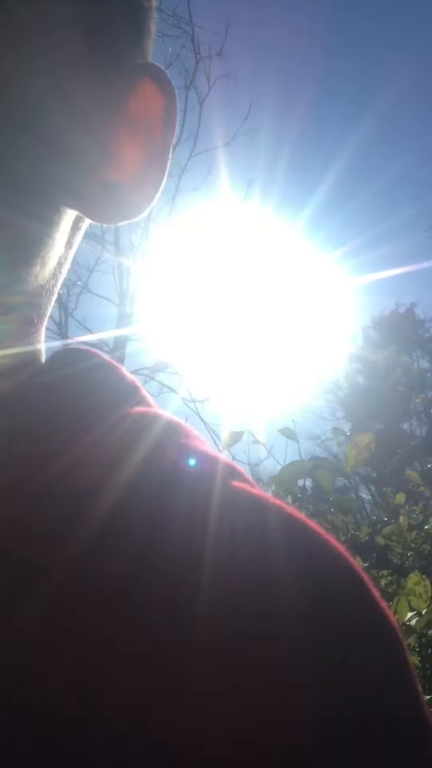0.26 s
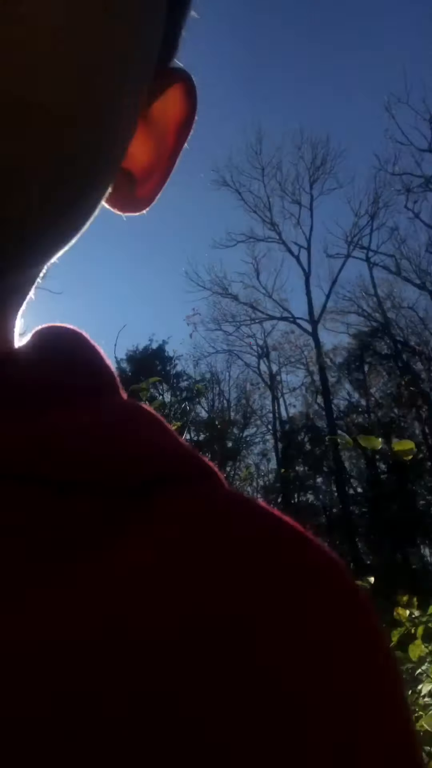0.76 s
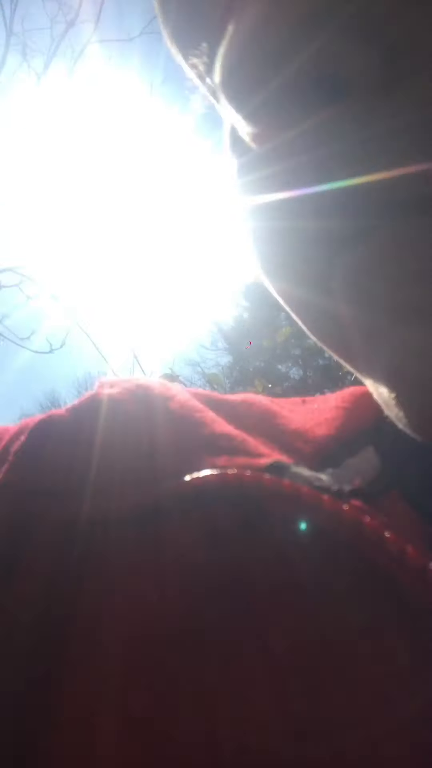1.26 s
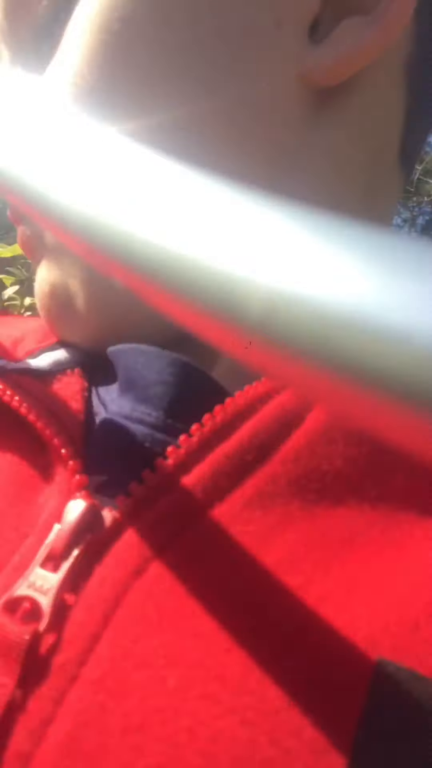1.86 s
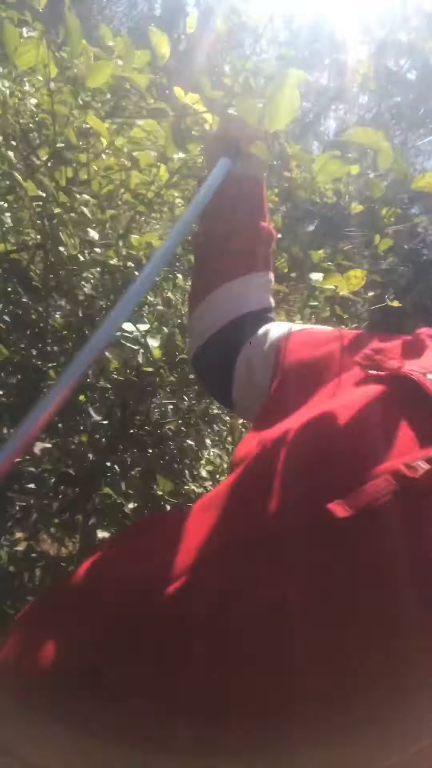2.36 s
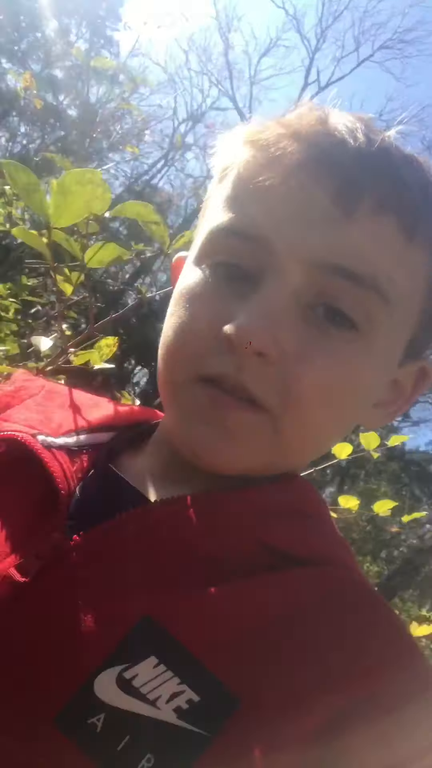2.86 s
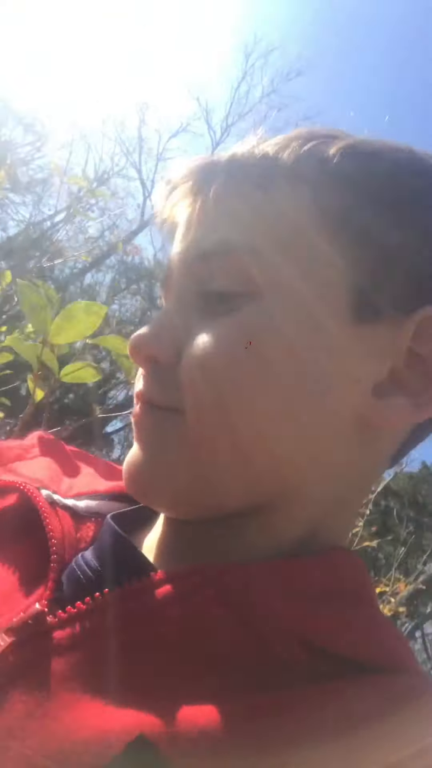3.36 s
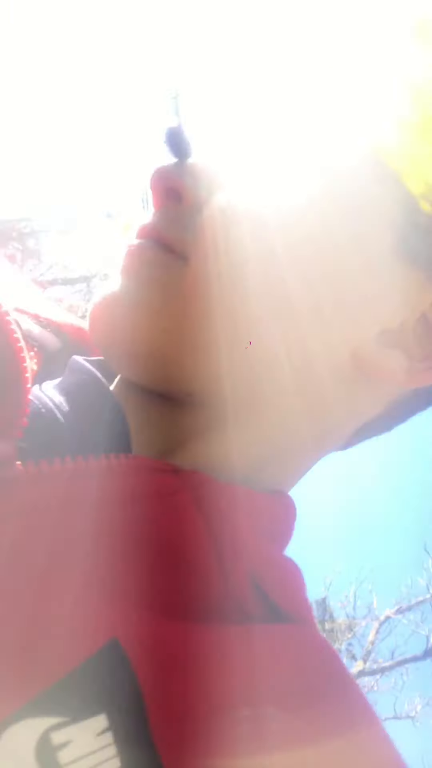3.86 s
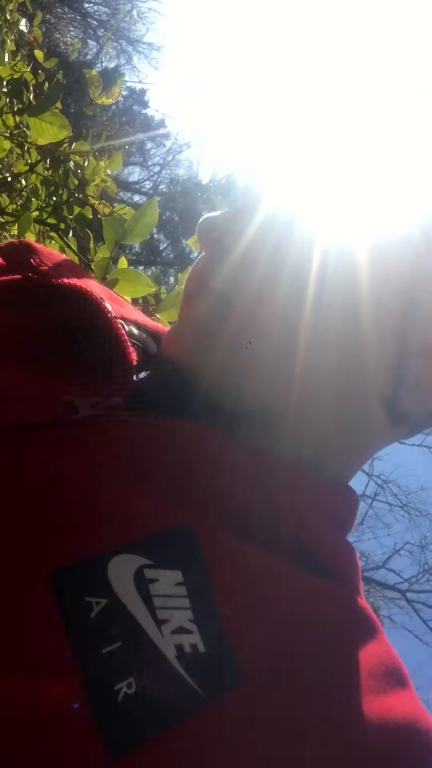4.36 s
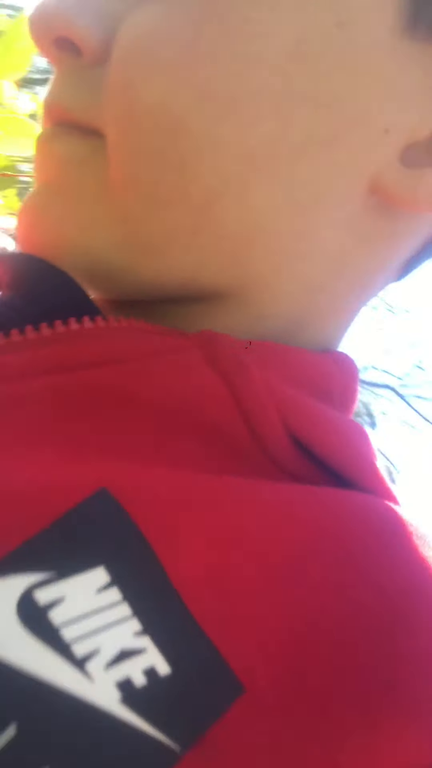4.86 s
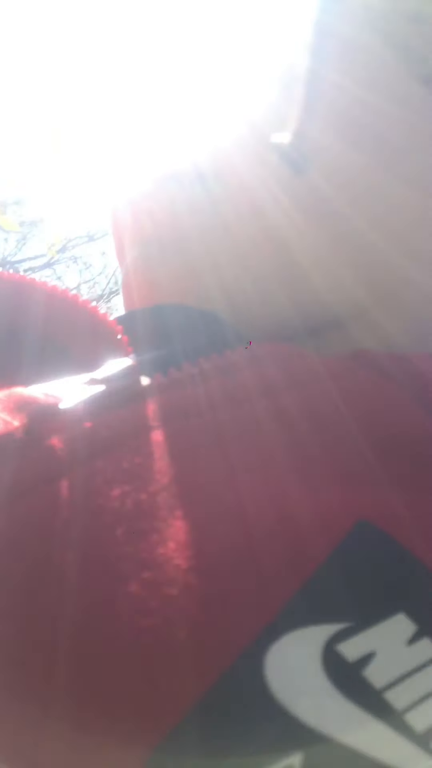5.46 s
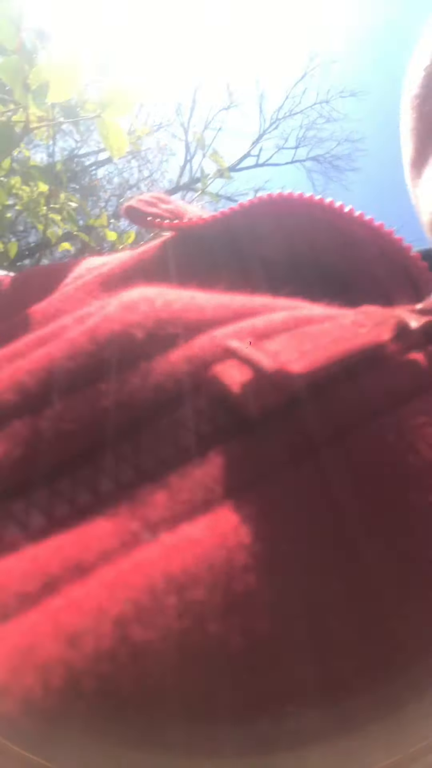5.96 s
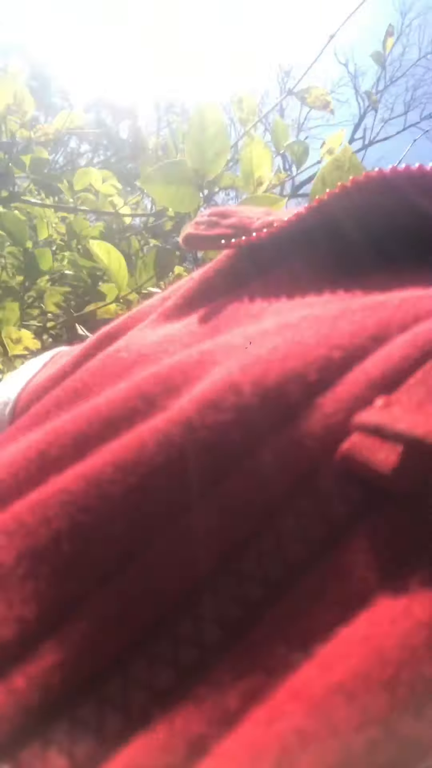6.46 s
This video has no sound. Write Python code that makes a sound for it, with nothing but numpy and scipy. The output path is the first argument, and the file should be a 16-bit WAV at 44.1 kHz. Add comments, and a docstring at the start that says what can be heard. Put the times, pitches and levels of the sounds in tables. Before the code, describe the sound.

Dry leaves and stems rustle and swish close by as someone pushes through brush, twigs snapping sharply, one hard stick knock, faint engine drone underneath.

```python
"""Dry brush: someone pushes through it with a hand-held microphone and a light metal pole.
Leaves hiss and crackle and stems brush past (coloured grainy noise); twigs snap (click, noise burst, ring).
One stick knocks hard close by (ringing modes and a crack); twigs squeak along the pole (gliding sines).
A distant engine drones underneath (harmonics of its cycle) over a far rumble (low noise).
The gain control ducks just after loud sounds and recovers slowly."""
import sys
import numpy as np
from scipy import signal
from scipy.io import wavfile
from scipy.ndimage import uniform_filter1d

SR = 44100
rng = np.random.default_rng(int(sys.argv[2]) if len(sys.argv) > 2 else 0)


def wav_out(sig):
    """Save sig, one row per channel (or a flat mono array), as 16-bit PCM at SR to the path in sys.argv[1]."""
    wavfile.write(sys.argv[1], SR, np.round(np.clip(np.atleast_2d(sig).T, -1, 1) * 32767).astype(np.int16))


N = 296793


def from_db(db):
    """Decibels to amplitude gain."""
    return 10 ** (np.asarray(db) / 20)


def rms_one(x):
    """Scales to rms 1."""
    return x / np.sqrt(np.mean(x ** 2) + 1e-20)


def in_time(rows):
    """Each column after t/s as a curve over all samples."""
    times_s, *columns = np.transpose(rows)
    t = np.arange(N) / SR
    return [np.interp(t, times_s, column) for column in columns]


def band(x, low_hz, high_hz):
    """Second-order Butterworth band-pass."""
    edges_hz = [low_hz, min(high_hz, 0.45 * SR)]
    return signal.sosfilt(signal.butter(2, edges_hz, "band", fs=SR, output="sos"), x)


def drift(rate_hz):
    """Slow random curve of rms 1, changing about rate_hz times a second."""
    step = 40   # samples between drawn points
    pole = np.exp(-2 * np.pi * rate_hz * step / SR)
    noise = rng.standard_normal(N // step + 2002)
    slow = signal.lfilter([1], [1, -2 * pole, pole ** 2], noise)[2000:]   # settled part
    return np.interp(np.arange(N) / step, np.arange(len(slow)), rms_one(slow))


def ring(x, hz, t60_s):
    """Two-pole resonator: a unit click sets a decaying sine of height 1 ringing."""
    radius = from_db(-60 / (t60_s * SR))
    angle = 2 * np.pi * hz / SR
    poles = [1, -2 * radius * np.cos(angle), radius ** 2]
    return signal.lfilter([0, np.sin(angle)], poles, x + 1e-18)


def coloured(sources, spectrum, patchy_db, tilt_db=0):
    """Quarter-octave bands, alternately from two sources, flickering separately; tilt_db/octave about 6 kHz."""
    hz_points, db_points = np.transpose(spectrum)
    octaves = np.log2(hz_points[-1] / hz_points[0])
    edges_hz = np.geomspace(hz_points[0], hz_points[-1], round(4 * octaves) + 1)
    out = 0
    for k, (low_hz, high_hz) in enumerate(zip(edges_hz, edges_hz[1:])):
        centre_hz = np.sqrt(low_hz * high_hz)
        level_db = np.interp(np.log(centre_hz), np.log(hz_points), db_points)
        level_db = level_db + tilt_db * np.log2(centre_hz / 6000)
        flicker_db = patchy_db * drift(10.545)
        out = out + from_db(level_db + flicker_db) * band(sources[k % 2], low_hz, high_hz)
    return out


def crackle(per_s, spread_db, grain_s, hiss_share):
    """Clumped tiny contacts, each a decaying puff of noise, over smooth hiss; two unrelated carriers."""
    sizes = from_db(spread_db * np.minimum(rng.exponential(1, N), 4))
    born = rng.random(N) < per_s * from_db(5.0 * drift(20)) / SR   # drifting rate makes clumps
    decay = np.exp(-1 / (grain_s * SR))
    puffs = rms_one(signal.lfilter([1], [1, -decay], sizes * born))
    envelope = np.sqrt(hiss_share + (1 - hiss_share) * puffs ** 2)
    return rng.standard_normal((2, N)) * envelope


# leaf and stem colour: f/Hz, relative density/dB per Hz
LEAF_COLOUR = [(900, -18), (1400, -10), (2500, -7.5), (3800, -5.5), (5000, -6), (6800, -5), (8500, -9),
               (11500, -7), (16500, -10)]
STEM_COLOUR = [(150, -6.5), (300, -3), (600, -1.5), (1200, -1), (1900, -7), (3000, -14)]
# slowly rising and falling background rustle of leaves and stems:
# t/s, leaf level/dB, leaf brightness/dB per octave, stem level/dB
RUSTLE_CURVE = [(0.0, -71, -1, -74), (0.12, -70, -1, -72), (0.78, -74.5, -2, -75), (1.0, -67.5, -1, -70.5),
                (1.72, -69, 1, -70), (1.82, -62.5, -0.14, -66), (2.05, -53, -0.045, -60),
                (2.33, -50, -0.2024, -58), (2.57, -62, -0.5, -71), (2.8, -62, 0, -66.5),
                (2.87, -67, -0.5, -71), (3.3, -59, -0.2289, -63), (3.72, -68.5, -0.5, -75),
                (4.7, -65, -0.5, -67), (5.06, -70, 1.5, -69.5), (5.7, -74, -0.6, -67), (6.3, -67, 2.4, -65),
                (6.73, -69, 2.2, -65)]
# branches swishing past: peak t/s, 10 dB swell/s, 10 dB fade/s, leaf level/dB,
# leaf brightness/dB per octave, stem level/dB; a negative swell or fade leaves the swish all but silent
BRANCH_SWISHES = [(0.019, 0.13, 0.0544, -58.5, -2, -64.5), (0.32, 0.2846, 0.0964, -65.5, 0, -78),
                  (0.865, 0.0321, 0.0534, -52, -1.8, -63.5), (0.99, 0.0571, 0.0221, -59, 2, -66.5),
                  (1.085, 0.0586, 0.0619, -53, -1.5, -57), (1.23, 0.0148, .12, -63, -1.3, -67.5),
                  (1.33, 0.0748, 0.0036, -63, -1.3, -63.5), (1.45, 0.0238, 0.0945, -63.5, 1, -65),
                  (1.589, 0.0889, .08, -58.5, -1, -58), (1.7, .05, -0.0025, -61.5, 0.1, -67),
                  (1.8, 0.1011, 0.1056, -57.5, -0.3, -62), (2.02, 0.0429, 0.1556, -52, 0.6, -64),
                  (2.25, 0.1091, 0.1022, -47, 0.4, -57.5), (2.39, 0.0703, 0.0442, -49.5, -0.8, -61),
                  (2.47, 0.0236, 0.089, -53.5, -1.6, -63), (3.115, .03, .06, -62, -1.2, -67),
                  (3.49, .04, 0.0835, -60, 0.6, -62.5), (3.57, 0.0404, 0.1264, -63.5, -1.1, -68),
                  (3.842, 0.0217, 0.089, -52.5, -0.6, -65.5), (4.009, 0.0722, -0.0297, -63, 0.1, -63),
                  (4.12, 0.0736, 0.0946, -63, -0.6, -59), (4.23, 0.0139, 0.1525, -64, -2.4, -61),
                  (4.36, 0.0561, 0.0121, -58.5, -0.6, -64.5), (4.57, 0.097, 0.0134, -57.5, -1.1, -66.5),
                  (4.662, 0.0404, 0.1228, -56.5, 0.2, -66), (4.81, 0.0818, 0.0808, -55, 0.4, -65.5),
                  (4.94, 0.044, 0.0912, -63, 1.1, -66), (5.168, .08, .05, -61.5, 2.6, -65.5),
                  (5.208, .055, .045, -61, -2.8, -51.5), (5.29, .015, .15, -59, 2.1, -70),
                  (5.39, 0.0335, 0.098, -55.5, 3, -54), (5.48, 0.0791, 0.0962, -57, -1.5, -56),
                  (5.545, 0.0357, .03, -60, 1.1, -61), (5.65, .05, .03, -63, 1.1, -63.5),
                  (5.75, .02, .25, -63.5, 1.6, -82.5), (6.059, 0.1134, 0.1069, -56.5, -2.5, -65),
                  (6.185, .05, .15, -63.5, 2.2, -66), (6.51, -0.05, -0.0335, -66.5, 1.1, -63.5)]


def brush():
    """Bright leaves and duller stems: rustle and swishes add in power; the louder sets leaf brightness."""
    leaf_db, brightness_db, stem_db = in_time(RUSTLE_CURVE)
    power = from_db([leaf_db, stem_db]) ** 2
    weighted_db = brightness_db * power[0]
    t = np.arange(N) / SR
    for peak_s, swell_s, fade_s, leaf_db, brightness_db, stem_db in BRANCH_SWISHES:
        start = max(0, round((peak_s - 4 * swell_s) * SR))
        near = slice(start, round((peak_s + 4 * fade_s) * SR))
        since_s = t[near] - peak_s
        shape = 10 ** -np.maximum(since_s / fade_s, -since_s / swell_s)   # power
        power[:, near] += from_db([[leaf_db], [stem_db]]) ** 2 * shape
        weighted_db[near] += brightness_db * from_db(leaf_db) ** 2 * shape
    leaf_grains = crackle(per_s=500.0, spread_db=3.36, grain_s=0.001396, hiss_share=0.6005)
    stem_grains = crackle(per_s=300.0, spread_db=2.7, grain_s=0.002267, hiss_share=0.6)
    leaves = coloured(leaf_grains, LEAF_COLOUR, patchy_db=1.6418, tilt_db=weighted_db / power[0])
    stems = coloured(stem_grains, STEM_COLOUR, patchy_db=2.5)
    return np.sqrt(power[0]) * rms_one(leaves) + np.sqrt(power[1]) * rms_one(stems)


# twig snaps: t/s, ring f/Hz, relative thud, body and spit levels/dB, t60/s
TWIG_SNAPS = [(0.019, 7190, -62.5, -66.5, -40, 0.02076), (0.312, 3097, -58, -51.5, -45, 0.02385),
              (0.846, 2602, -51.5, -43.5, -37.5, 0.0084), (0.868, 7004, -61, -49.5, -40.5, 0.01192),
              (0.9, 5360, -57.5, -53, -37, 0.00825), (1.032, 2074, -69, -45.5, -47, 0.01452),
              (1.154, 1790, -61.5, -71, -37.5, 0.00616), (1.28, 2011, -68.5, -39, -55.5, 0.01096),
              (1.456, 3045, -50.5, -44, -53, 0.01575), (1.507, 841.5, -75.5, -46, -55.5, 0.01822),
              (1.594, 2810, -63, -49, -49.5, 0.03016), (1.697, 2119, -60, -44, -43, 0.012),
              (1.708, 6400, -63.5, -61.5, -33, 0.01179), (1.742, 923.2, -44, -42, -45, 0.02232),
              (1.759, 1107, -71, -46.5, -44, 0.02368), (1.807, 1503, -54.5, -39.5, -36, 0.00798),
              (2.01, 6342, -72, -45, -38.5, 0.02383), (2.157, 1132, -61.5, -37, -46, 0.01331),
              (2.214, 7500, -55.5, -39, -34, 0.025), (2.238, 6447, -49.5, -45.5, -38, 0.01486),
              (2.253, 7524, -48, -24, -21, 0.021545), (2.279, 5656, -45, -42.5, -28, 0.00972),
              (2.303, 5590, -57, -52, -33.5, 0.00601), (2.381, 1712, -45, -32.5, -29, 0.015515),
              (2.399, 3761, -66, -41, -28, 0.02043), (2.71, 2500, -67, -49, -50, 0.012),
              (3.168, 1609, -51, -47, -41, 0.02901), (3.386, 7017, -72, -56.5, -39, 0.012),
              (3.41, 3703, -69.5, -46.5, -53.5, 0.03045), (3.479, 1495, -68, -46.5, -52, 0.047),
              (3.826, 5293, -42.5, -36.5, -45.5, 0.0318), (3.972, 3871, -58, -52, -56, 0.012),
              (4.443, 813, -44.5, -48, -54.5, 0.01823), (4.554, 1183, -55.5, -36, -34, 0.00937),
              (4.574, 3746, -60, -48, -57, 0.02667), (4.617, 2200, -50, -35, -50, 0.01),
              (4.6207, 2466, -50, -37, -50, 0.012), (4.681, 1256, -34.5, -52, -55.5, 0.010325),
              (4.763, 3323, -69.5, -44, -54, 0.00786), (5.079, 1857, -44.5, -36.5, -42, 0.00741),
              (5.115, 1230, -52, -54, -59, 0.0054), (5.319, 1385, -34, -32, -47, 0.011626),
              (5.362, 709, -40, -60, -55.5, 0.00719), (5.374, 7230, -60, -58.5, -42.5, 0.01103),
              (6.187, 711, -60.5, -49, -45, 0.04015), (6.232, 897.6, -40.5, -46.5, -48, 0.00567),
              (6.311, 1500, -58, -47, -48, 0.01156), (6.494, 1100, -52, -56, -66, 0.012)]


def snaps():
    """Each break is a click and a dying burst of fibres tearing; the twig rings briefly at its own pitch."""
    size = 4000   # samples
    out = np.zeros(N + size)
    t = np.arange(size) / SR
    for start_s, hz, *levels_db, t60_s in TWIG_SNAPS:
        burst = rng.standard_normal(size) * from_db(-60 * t / t60_s)
        burst[0] = 5.894   # click
        burst += from_db(-21.5) * ring(burst, hz, t60_s)
        thud, body, spit = band(burst, 250, 1200), -band(burst, 1200, 5000), band(burst, 5000, 16000)
        at = round(start_s * SR)
        for db, part in zip(levels_db, (thud, body, spit)):
            crest = np.sqrt(2 * uniform_filter1d(part ** 2, size=30).max())   # from short-time rms
            out[at:at + size] += from_db(db - 3.5) * part / crest
    return out[:N]


# stick modes: f/Hz, level re click/dB, t60/s
STICK_MODES = [(98.18, -16, 0.061), (298.46, -15.5, 0.04466), (582.7, -7, 0.04276), (657.42, -0.5, 0.04769),
               (999.7, 0.5, 0.01817), (1213.4, 1, 0.01595), (1465.2, -7, 0.02965), (1682.9, -2.5, 0.02573),
               (1768.2, 5, 0.013), (2157.8, -8.5, 0.03164), (2456.2, -10.5, 0.02565),
               (2849, -11.5, 0.04782), (3163.3, -12, 0.0497), (3731.1, -10, 0.02704),
               (4441.5, -7.5, 0.01813), (5336.9, -10.5, 0.02434), (5629, -17.5, 0.05354),
               (6925.7, -7.5, 0.01962), (8007.4, -6.5, 0.01021), (9157, 0.5, 0.003815)]
KNOCK_S, KNOCK_DB = 1.530, -19
REBOUND_S, REBOUND_DB = 0.00231, -14.5   # after the blow, re the blow
CRACK_DB, CRACK_T60_S = -20, 0.018353    # noise level before band-pass


def knock():
    """One hard blow: a short splintering crack, and all the stick's modes set ringing."""
    at = round(KNOCK_S * SR)
    click = np.zeros(N)
    click[at] = from_db(KNOCK_DB)
    click[at + round(REBOUND_S * SR)] = -from_db(KNOCK_DB + REBOUND_DB)   # the stick springs back
    rings = [from_db(db) * ring(click, hz, t60_s) for hz, db, t60_s in STICK_MODES]
    # a thin stick radiates little below its first bending modes
    bending = band(sum(rings[2:]), 801.85, 11000)
    hand_thump = rings[0] - rings[1]
    out = bending + hand_thump
    size = 2000
    since_s = np.arange(size) / SR
    splinter = band(rng.standard_normal(size), 1303, 10721)
    out[at:at + size] += from_db(CRACK_DB - 60 * since_s / CRACK_T60_S) * splinter
    return out


# twigs sliding along or pinging the pole: t/s, length/s, first f/Hz, last f/Hz, level/dB before flutter
POLE_SQUEAKS = [(1.055, 0.0345, 3810, 4059, -56), (1.325, .115, 5750, 5900, -60),
                (1.42, .07, 5900, 5300, -65), (1.38, .07, 5170, 5190, -67),
                (2.398, 0.01888, 3700, 3719, -50.5), (2.455, .025, 3000, 3044, -55),
                (3.465, .04, 1350, 1476, -56.5), (4.435, .045, 810, 958.7, -54.5),
                (4.489, .05, 1000, 1285, -59), (4.473, .06, 2680, 3030, -62.5),
                (4.528, .06, 3300, 3987, -71.5), (4.628, .065, 2400, 4850, -57),
                (4.694, .065, 810, 1767, -64.5), (5.51, .065, 535, 490.3, -55.5),
                (5.624, .045, 600, 542.3, -57), (5.772, .095, 6200, 7300, -68),
                (5.79, .06, 3000, 3100, -72)]
EDGE_SHARE, EDGE_DB, SAG_DB = 0.2054, -11.5, -5   # fade in and out; level lost while it holds


def squeaks():
    """Stick-slip tones that glide as the contact slides; pitch and level tremble."""
    out = np.zeros(N)
    tremble_hz = 71.21 * drift(196.8)
    flutter = 1 + 0.5 * drift(160.9)
    for start_s, length_s, first_hz, last_hz, level_db in POLE_SQUEAKS:
        along = np.linspace(0, 1, round(length_s * SR))
        start = round(start_s * SR)
        span = slice(start, start + len(along))
        shape_db = np.interp(along, [0, EDGE_SHARE, 1 - EDGE_SHARE, 1], [EDGE_DB, 0, SAG_DB, EDGE_DB])
        hz = first_hz + (last_hz - first_hz) * along + tremble_hz[span]
        out[span] += from_db(level_db + shape_db) * np.sin(2 * np.pi * np.cumsum(hz) / SR)
    return out * flutter


# distant engine: t/s, level/dB
ENGINE_LEVEL = [(0.0, -58), (0.2, -57), (1.31, -61.5), (1.85, -57), (2.15, -60), (2.3, -56), (3.15, -58.5),
                (3.3, -53), (3.75, -60), (5.16, -59), (5.44, -72), (6.17, -60.5), (6.73, -58.5)]
# engine harmonics: multiple of the cycle, relative level/dB
CYCLE_ORDERS = [(2, 1.5), (3, 2.5), (4, -1.5), (5, -8), (6, -6), (8, -16), (10, -18), (12, -16.5)]
ENGINE_CYCLE_HZ = 20.681


def engine():
    """Low orders of the firing cycle, each swelling a little on the way through the air."""
    level_db, = in_time(ENGINE_LEVEL)
    cycle_hz = ENGINE_CYCLE_HZ + 0.14843 * drift(1.4531)
    phase = 2 * np.pi * np.cumsum(cycle_hz) / SR
    orders = 0
    for multiple, db in CYCLE_ORDERS:
        swell = from_db(db + 3.41 * drift(3.46))
        orders = orders + swell * np.sin(multiple * phase + rng.uniform(0, 2 * np.pi))
    return from_db(level_db) * rms_one(orders)


# far rumble of air and traffic: t/s, level in the 119-520 Hz band/dB
RUMBLE_LEVEL = [(0.0, -60), (0.09, -66), (0.32, -61.5), (0.54, -64.5), (1.05, -60.5), (1.42, -63.5),
                (1.55, -60.5), (1.78, -67), (2.25, -64), (2.83, -66), (3.63, -63.5), (5.0, -64),
                (5.45, -67.5), (6.39, -57.5), (6.73, -61)]
# rumble colour: f/Hz, relative density/dB per Hz
RUMBLE_SPECTRUM = [(25, -25.5), (40, -0.5), (80, 3.5), (150, -3.5), (280, -3.5), (450, -10), (800, -18.5),
                   (1400, -29)]


def rumble():
    """Far air and traffic as smooth low noise."""
    level_db, = in_time(RUMBLE_LEVEL)
    noise = coloured(rng.standard_normal((2, N)), RUMBLE_SPECTRUM, patchy_db=1.0)
    return from_db(level_db) * noise / np.std(band(noise, 118.56, 519.85))


def scene():
    """Everything reaches one microphone."""
    return (brush() + snaps() + knock() + squeaks() + engine() + rumble())[None]


# dips of the microphone port: f/Hz, width/Hz, gain/dB
PORT_DIPS = [(4869.9, 602, -4), (10481, 662, -5.5)]
DUCK_FROM_DB, DUCK_SHARE, RECOVER_DB_PER_S = -39.5, 0.5432, 29   # share: dB cut per dB above
DUCK_SMOOTH_S, CUTOFF_HZ = 0.02946, 15850


def record(dry):
    """Port dips; gain control ducks just after loud sounds and recovers slowly; the top is cut."""
    for hz, width_hz, db in PORT_DIPS:
        peak = signal.lfilter(*signal.iirpeak(hz, hz / width_hz, fs=SR), dry)
        dry = dry - (1 - from_db(db)) * peak
    mean_square = signal.lfilter([0.002], [1, -0.998], dry[0] ** 2)
    level_db = 10 * np.log10(mean_square + 1e-12)
    wanted_db = DUCK_SHARE * np.maximum(level_db - DUCK_FROM_DB, 0)
    ramp_db = RECOVER_DB_PER_S * np.arange(N) / SR
    held_db = np.maximum.accumulate(wanted_db + ramp_db) - ramp_db   # peak hold, linear release
    smooth = np.exp(-1 / (DUCK_SMOOTH_S * SR))
    duck_db = signal.lfilter([1 - smooth], [1, -smooth], held_db)
    low_pass = signal.ellip(10, 0.5, 60, CUTOFF_HZ, fs=SR, output="sos")
    return signal.sosfilt(low_pass, dry * from_db(-duck_db))


dry = scene()
out = record(dry)
wav_out(out)
```